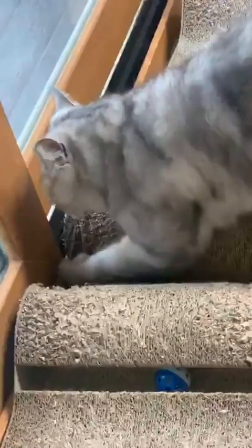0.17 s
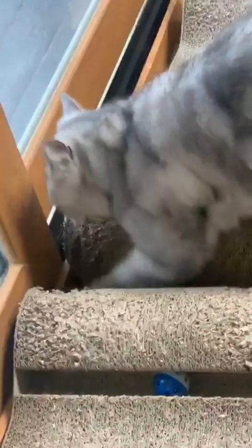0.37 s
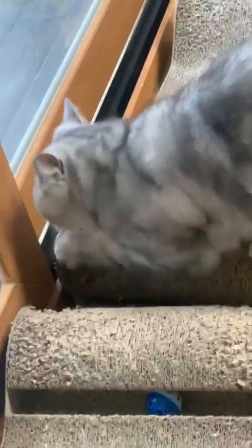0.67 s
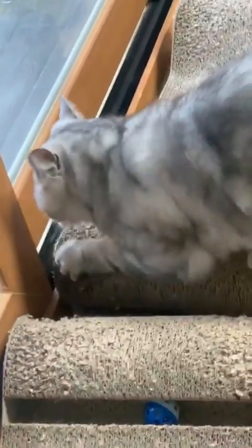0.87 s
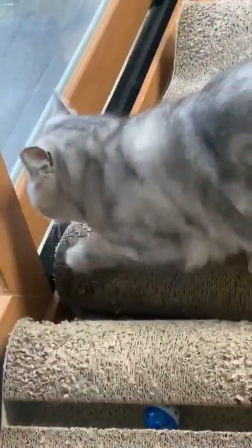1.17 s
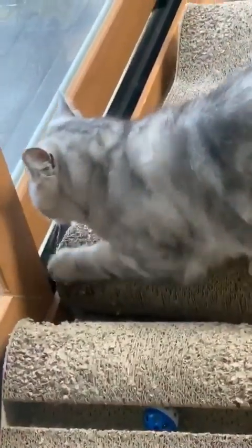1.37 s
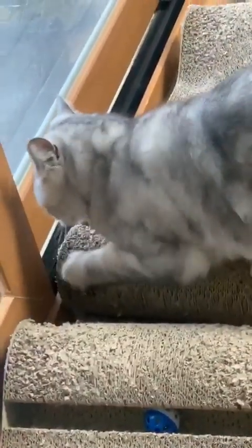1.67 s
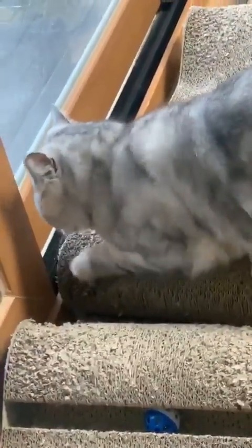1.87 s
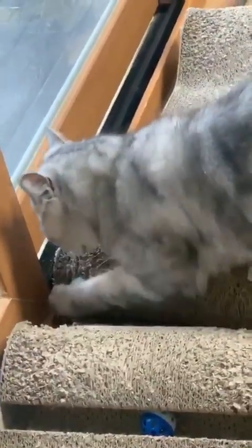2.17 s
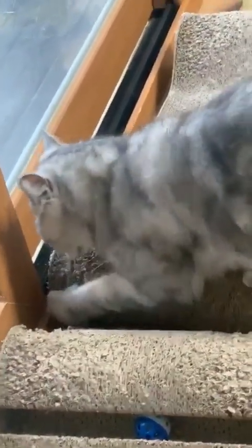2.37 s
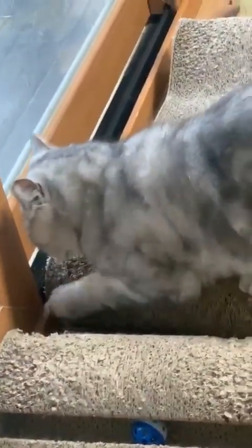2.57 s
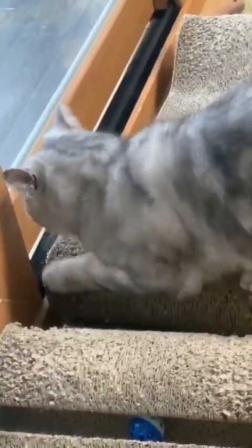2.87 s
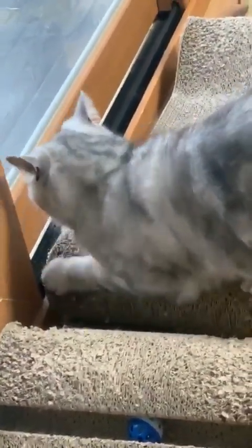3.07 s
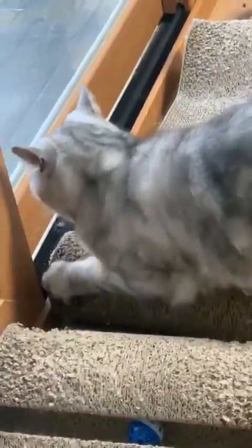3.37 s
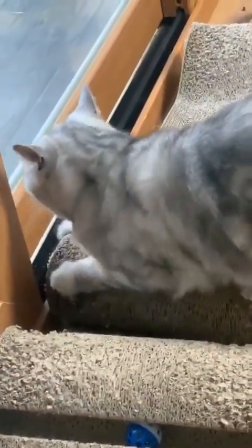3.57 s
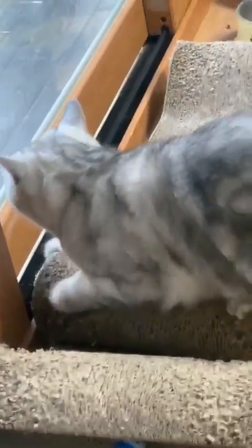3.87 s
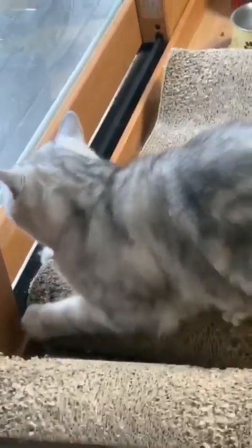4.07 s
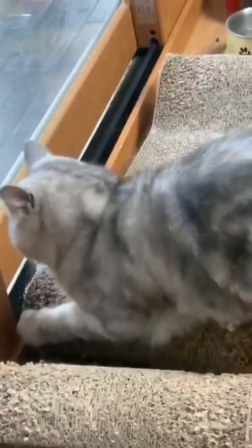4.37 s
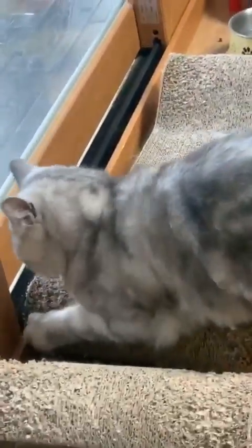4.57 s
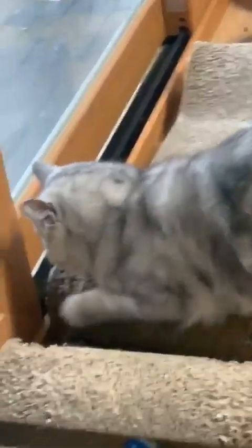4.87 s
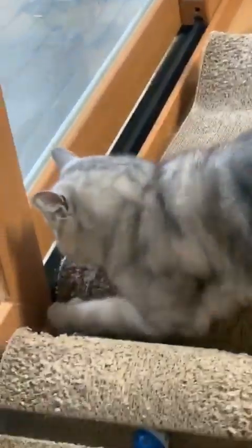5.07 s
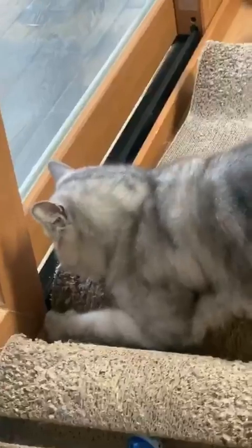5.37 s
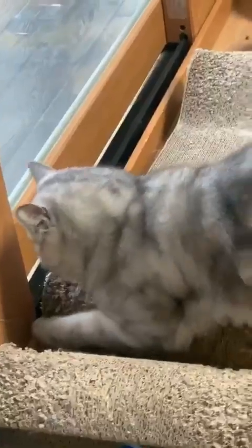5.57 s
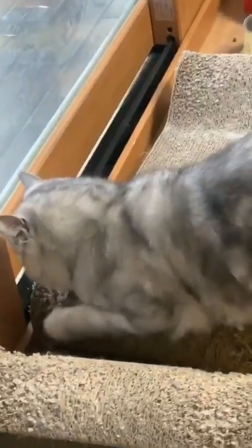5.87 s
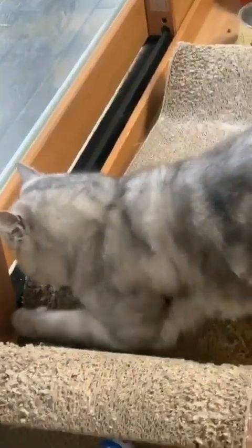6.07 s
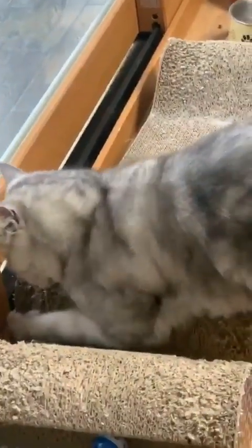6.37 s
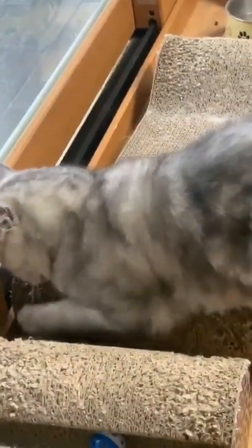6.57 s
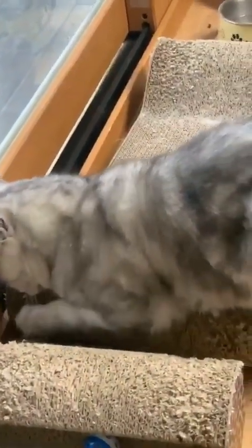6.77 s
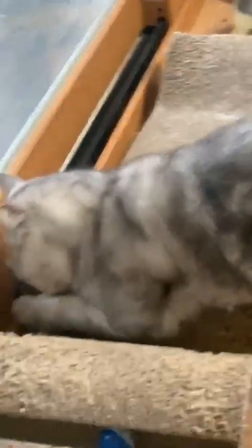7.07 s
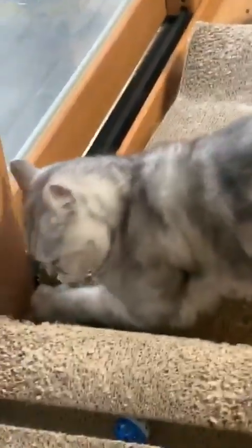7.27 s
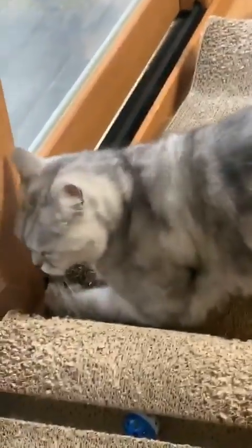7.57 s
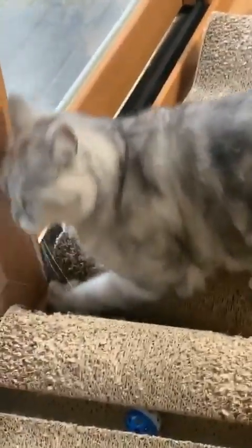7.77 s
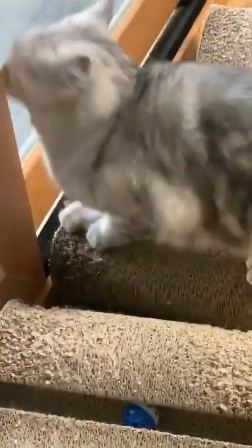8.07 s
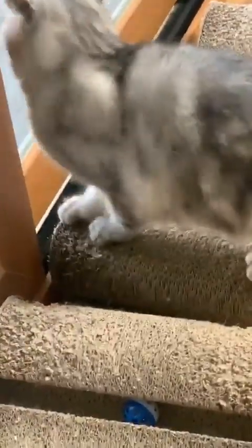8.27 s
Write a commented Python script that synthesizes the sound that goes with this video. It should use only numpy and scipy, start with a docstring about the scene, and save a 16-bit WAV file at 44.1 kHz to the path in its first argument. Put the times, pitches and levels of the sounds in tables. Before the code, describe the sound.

Close up in a fairly live room, a cat scratches a carpeted tower. Short, dry claw rasps come several a second, each with a padded, hollow thump. Wooden knocks break in, the hardest around three seconds, followed by a sparser spell. The digging then resumes with springy low plucks and bright snag ticks, ends after a last knock and stroke, and gives way to a soft breathy hiss.

```python
"""Cat digging on a carpeted tower

A cat digs and treads close by in a fairly live room. Claw drags are bursts of tiny slips and plucked fibres;
snagged loops and claw tips twang as short resonances. Paws push on a resonant platform that thuds and springs
back as a brief tone. Knocks and rubs ring modes of wood, and sways are low resonant noise. Shaped noise makes
the brushing fur, a breath-like hiss and the faint room rumble and hiss; a squeak is one thin gliding sine."""
import sys
import numpy as np
from scipy import signal
from scipy.fft import rfft, irfft, next_fast_len
from scipy.io import wavfile
from scipy.ndimage import uniform_filter1d, map_coordinates

SR = 44100
rng = np.random.default_rng(int(sys.argv[2]) if len(sys.argv) > 2 else 0)


def generate_wav(signal):
    """Clip the signal to [-1, 1] and save it as 16-bit WAV at the path in sys.argv[1]."""
    frames = np.transpose(np.atleast_2d(signal))
    scaled = np.clip(frames, -1, 1) * 32767
    pcm = np.round(scaled).astype(np.int16)
    wavfile.write(sys.argv[1], SR, pcm)


N = 371763
# time within one event, in seconds
T = np.arange(SR // 2) / SR
TOP_HZ = 14500

# A paw lands on the platform and pulls its claws through the pile. Each row: start in seconds, length in
# seconds, relative push in dB, hardness of the contact in Hz, thud of the tower in dB, relative claw hiss
# in dB, relative scrape of the backing in dB.
PAW_STROKES = [(0.174, 0.067, -33, 290, -37, -44.5, -40), (0.495, 0.047, -48, 480, -52.5, -58, -52.5),
               (0.599, 0.062, -48, 497, -45, -53, -43), (0.712, 0.04, -44, 596, -52.5, -54.5, -60),
               (0.828, 0.061, -38, 600, -48, -51, -38), (1, 0.037, -31, 680, -42, -48.5, -39.5),
               (1.21, 0.044, -56, 400, -50, -58, -49.5), (1.391, 0.032, -32.5, 750, -40, -64, -39.5),
               (1.531, 0.05, -30.5, 1070, -45, -41, -32.5), (1.645, 0.033, -34, 1300, -58, -60, -34),
               (1.715, 0.032, -45, 730, -49, -49, -46.5), (2.171, 0.039, -30, 684, -40, -53.5, -37),
               (2.273, 0.04, -39, 1100, -46.5, -45.5, -37.5), (2.452, 0.071, -40, 700, -49, -45, -36.5),
               (2.589, 0.034, -46, 1200, -57, -44.5, -50), (2.753, 0.076, -60.5, 700, -67, -72.5, -72),
               (3.416, 0.035, -32, 1010, -41.5, -42, -42), (3.546, 0.052, -48.5, 1200, -57.5, -51.5, -56),
               (3.953, 0.015, -50, 460, -58, -83, -50), (4.166, 0.022, -57.5, 450, -55.5, -71, -63),
               (4.395, 0.026, -33.5, 330, -37.5, -56, -33), (4.612, 0.036, -42, 453, -49.5, -45, -46),
               (4.746, 0.037, -44.5, 860, -55, -46, -47.5), (4.852, 0.045, -51, 700, -55.5, -56.5, -62),
               (5.208, 0.015, -34, 820, -48, -52, -30.5), (5.514, 0.042, -33, 1010, -49, -40, -31),
               (5.703, 0.05, -43, 750, -51.5, -45, -44), (5.917, 0.078, -46.5, 790, -51.5, -61, -45.5),
               (6.151, 0.042, -28, 433, -36, -48, -35.5), (6.199, 0.08, -38.5, 600, -56, -49, -43.5),
               (6.43, 0.04, -31, 860, -54, -38.5, -34), (6.606, 0.021, -46, 523, -57, -48.5, -50),
               (6.719, 0.026, -40, 900, -49, -43, -39), (7.29, 0.061, -32.5, 653, -41.5, -58, -43)]
# Hiss of the carpet pile. Each row: frequency in Hz, relative level in dB.
PILE_SPECTRUM = [(900, -38), (2200, -6), (3300, -14.5), (4400, -8), (5400, -5), (6400, 2.5), (7300, 0),
                 (8300, -5), (10200, -12.5), (12500, -7.5), (14500, -23)]


def amp(db):
    """Amplitude factor of a level in dB."""
    return 10 ** (np.asarray(db) / 20)


def unit(x):
    """Scale x to an rms of 1."""
    return x / np.sqrt(np.mean(x ** 2) + 1e-20)


def crest(x):
    """Scale x so that its loudest moment has rms 1."""
    span = round(.0073 * SR)
    return x / np.sqrt(uniform_filter1d(x ** 2, span).max() + 1e-20)


def along(points, hz):
    """Interpolate (Hz, value) points on a log frequency axis."""
    f, v = np.transpose(points)
    return np.interp(np.log(hz + 1), np.log(f + 1), v)


def add(track, s, x):
    """Mix x into the track from time s in seconds."""
    start = max(0, round(s * SR))
    track[start:start + len(x)] += x[:max(0, N - start)]


def filtered(x, response):
    """Multiply the spectrum of x by a complex response of frequency."""
    size = next_fast_len(len(x) + 8192)
    hz = np.fft.rfftfreq(size, 1 / SR)
    return irfft(rfft(x, size) * response(hz), size)[:len(x)]


def coloured(x, spectrum):
    """Shape x by a spectrum of (Hz, dB) points."""
    return filtered(x, lambda hz: amp(along(spectrum, hz)))


def ringing(x, modes):
    """Play x through a body's resonances (Hz, width Hz, dB), alternating in polarity."""
    def response(hz):
        total = 0
        for k, (centre, width, db) in enumerate(modes):
            damping = 1j * hz * width
            total = total + (-1) ** k * amp(db) * damping / (centre * centre - hz * hz + damping)
        return total
    return filtered(x, response)


def swell(length):
    """Split a stroke's length into its build-up and its decay time, in seconds."""
    rise_share = 0.37
    return rise_share * length, (1 - rise_share) * length


def stroke(rise, fall):
    """Pressure of one stroke: it builds up, then dies away exponentially."""
    build_up = np.sqrt(np.minimum(T / max(rise, .001), 1))
    return build_up * np.exp(-np.maximum(T - rise, 0) / max(fall, .002))


def press(rise, fall):
    """Weight of a soft paw: it sinks in more gradually than a plain stroke, then lets go."""
    return stroke(rise, fall) * np.sqrt(np.minimum(T / max(rise, .001), 1))


def wobble(rate, size):
    """A smooth random curve with rate knots a second."""
    knots = rng.standard_normal(1024)
    return map_coordinates(knots, [np.arange(size) * rate / SR], mode="mirror")


def slips(rate, spread_db):
    """Tiny slips: random impulses, rate a second, of uneven size and either sign."""
    hits = rng.random(len(T)) < rate / SR
    sizes = amp(spread_db * np.clip(rng.standard_normal(len(T)), -2, 2))
    return unit(hits * sizes * rng.choice([-1, 1], len(T)))


def in_room(x, wet_db, gap=0.0023):
    """Add a diffuse tail, new for each call, that sets in over gap seconds; each frequency dies at its own speed."""
    # The room's decay. Each row: frequency in Hz, time to fall by 60 dB in seconds.
    decay = [(100, 0.45), (330, 0.56), (700, 0.56), (1100, 0.45), (3000, 0.43), (7000, 0.24), (14000, 0.26)]
    hz, t, z = signal.stft(rng.standard_normal(len(T) + SR // 10), SR, nperseg=256)
    tail = signal.istft(z * amp(-60 * t / along(decay, hz)[:, None]), SR, nperseg=256)[1]
    tail *= 1 - np.exp(-(np.arange(len(tail)) / SR / gap) ** 2)
    response = amp(wet_db) * tail / np.linalg.norm(tail)
    response[0] += 1  # direct sound
    return signal.fftconvolve(x, response)


def room_tone():
    """Steady noise shaped into a low rumble and a thin hiss."""
    # Each row: frequency in Hz, relative level in dB.
    air = [(20, -8), (55, 4), (110, -5), (180, -15), (350, -14.5), (800, -26.5), (2500, -29.5), (7000, -31),
           (10000, -42.5), (14500, -39.5)]
    return amp(-60.0) * unit(coloured(rng.standard_normal(N), air))


def squeak():
    """One thin gliding whistle, a sine of moving pitch and level, as the cat lifts its head."""
    track = np.zeros(N)
    # The squeak dips, rises and sinks away. Each row: time in seconds, pitch in Hz, level in dB.
    glide = [(7.755, 12200, -92), (7.772, 11900, -71), (7.795, 11250, -81), (7.817, 10500, -92),
             (7.838, 11250, -77), (7.878, 11780, -71), (7.912, 10650, -87), (7.935, 10400, -80),
             (7.97, 9600, -93)]
    s, hz, db = np.transpose(glide)
    t = np.arange(s[0], s[-1], 1 / SR)
    cycles = np.cumsum(np.interp(t, s, hz)) / SR
    tone = unit(np.sin(2 * np.pi * cycles))
    add(track, s[0], amp(np.interp(t, s, db)) * tone)
    return track


def breath():
    """A soft, breath-like hiss of finely grained noise that swells and lingers."""
    track = np.zeros(N)
    # Swell of the hiss. Each row: time in seconds, level in dB.
    level = [(7.3, -88), (7.45, -63), (7.58, -60.5), (7.7, -60), (7.8, -68.5), (7.94, -68), (8.1, -92)]
    # Colour of the hiss. Each row: frequency in Hz, relative level in dB.
    hiss = [(300, -11), (1200, 4), (2500, -2), (4500, -8.5), (7500, -4.5), (10000, -18), (14500, -11.5)]
    s, db = np.transpose(level)
    t = np.arange(s[0], s[-1], 1 / SR)
    grain = rng.standard_normal(len(t)) * amp(1.7 * wobble(300, size=len(t)))
    add(track, s[0], amp(np.interp(t, s, db)) * unit(coloured(grain, hiss)))
    return track


def fur():
    """The coat drags softly over the pile as the cat shifts its weight: noise, uneven as it catches on tufts."""
    # Brushing between strokes. Each row: time in seconds, relative level in dB.
    brushing = [(0.0, -51.5), (0.45, -57), (1.3, -53.5), (1.71, -50.5), (2.02, -59), (2.44, -54),
                (2.72, -59.5), (2.9, -62.5), (3.15, -51.5), (3.4, -58), (3.801, -68), (4.15, -65.5),
                (4.3, -57), (4.58, -48), (4.93, -59.5), (5.59, -51), (5.9, -56), (6.6, -50.5),
                (7.03, -64.5), (7.42, -51.5), (7.7, -65.5), (7.98, -70.5), (8.43, -73)]
    # Fur on carpet. Each row: frequency in Hz, relative level in dB.
    coat = [(200, 3.5), (350, 6.5), (1000, 9.5), (2800, -5), (4500, -6), (6800, -3), (9500, -12.5),
            (14500, -28)]
    level_db = -2.5 + np.interp(np.arange(N) / SR, *np.transpose(brushing))
    tufts = amp(2.5 * wobble(110, size=N))
    brush = coloured(rng.standard_normal(N) * tufts, coat)
    return amp(level_db + 2 * wobble(16, size=N)) * unit(brush)


def knocks():
    """The tower hits wood: a firm contact and a dying chatter ring its modes, with a bright, reverberant crack on top."""
    track = np.zeros(N)
    # Each row: start in seconds, level in dB, crack in dB, weight of the low modes in dB, treble tilt in dB
    # per octave.
    hits = [(0.0, -32, -53, 5, -4), (0.858, -30, -54.5, 0, 3), (3.023, -20, -44.5, 1, 7),
            (3.082, -43.5, -54, 12.5, 6), (3.12, -34, -62, 15, 3), (3.948, -57, -65, 15, 9),
            (4.377, -24.5, -56, 1.5, -4), (5.085, -25.5, -52.5, -0.5, -6), (5.207, -33.5, -69, -15, 4),
            (7.116, -23, -46, -0.5, 1.5)]
    # Modes of the knocked wood; the narrow ones ring on. Each row: pitch in Hz, width in Hz, relative level in dB.
    wood = [(130, 45, -9), (278, 35, -11), (342, 35, -3), (590, 90, -3), (725, 80, 3), (792, 10, 11),
            (863, 26, -1), (1024, 18, 2), (1085, 130, -4), (1146, 16, 6), (1190, 80, -2), (1299, 40, -1),
            (1456, 70, -11), (1950, 300, -23), (2300, 260, -21)]
    # The padded contact passes little of the treble. Each row: frequency in Hz, gain in dB.
    padding = [(1300, 0), (1550, -.5), (1900, -4), (2400, -6), (4000, -14)]
    # The bright edge of a knock. Each row: frequency in Hz, relative level in dB.
    edge = [(800, -12), (1700, -1), (2250, 1), (2900, -6), (5000, -1), (7500, -6), (10000, -20),
            (14500, -26)]
    low_modes_hz, tilt_above_hz = 520, 900
    chatter_db, grit_db = -24, -9.5  # loose frame and grinding surfaces, noise against the contact impulse
    contact = signal.unit_impulse(len(T))
    for s, db, crack_db, low_db, tilt_db in hits:
        struck = []
        for hz, width, level in wood:
            tilt = tilt_db * max(0, np.log2(hz / tilt_above_hz))
            struck.append((hz, width, level + low_db * (hz < low_modes_hz) + tilt))
        blow = in_room(contact, wet_db=-1.5, gap=0.005)
        add(blow, 0, amp(chatter_db) * rng.standard_normal(len(T)) * stroke(rise=0.0059, fall=0.0035))
        crack = in_room(contact, wet_db=19.0)  # nearly all room tail
        add(crack, 0, amp(grit_db) * rng.standard_normal(len(T)) * stroke(rise=.0005, fall=0.0075))
        knock = amp(db) * crest(coloured(ringing(blow, struck), padding))
        add(track, s, knock + amp(crack_db) * crest(coloured(crack, edge)))
    return track


def rubs():
    """The tower rubs along the wood: tiny slips ring its modes, with one pitch favoured."""
    track = np.zeros(N)
    # Each row: start in seconds, length in seconds, level in dB, pitch in Hz.
    passes = [(0.843, 0.037, -42, 870), (0.947, 0.065, -47, 890), (1.922, 0.057, -42.5, 830),
              (1.958, 0.043, -54, 1020), (2.315, 0.033, -42, 910), (6.154, 0.0052, -37, 1250)]
    # Modes of the rubbed wood. Each row: pitch in Hz, width in Hz, relative level in dB.
    wood = [(130, 45, -9), (278, 35, -11), (342, 35, -3), (590, 90, -3), (725, 80, 3), (792, 10, 11),
            (863, 26, -1), (1024, 18, 2), (1085, 130, -4), (1146, 16, 6), (1190, 80, -2), (1299, 40, -1),
            (1456, 70, -11), (1950, 300, -23), (2300, 260, -21)]
    for s, length, db, hz in passes:
        rubbing = ringing(slips(rate=760, spread_db=3.5) * stroke(*swell(length)), wood)
        pitched = ringing(rubbing, [(hz, hz / 3, 0)])
        add(track, s, in_room(amp(db) * crest(pitched), wet_db=-12.5))
    return track


def sways():
    """The tower sways and rumbles under the cat's shifting weight: noise through a broad resonance, twice."""
    track = np.zeros(N)
    # Each row: start in seconds, length in seconds, level in dB, pitch in Hz.
    leans = [(0.077, .012, -41, 80), (0.213, 0.17, -43, 55), (3.043, 0.16, -42, 47.7),
             (3.156, 0.01, -38, 54.6), (8.31, 0.2, -57, 175)]
    for s, length, db, hz in leans:
        base = [(hz, hz, 0)]
        rocking = rng.standard_normal(len(T)) * stroke(*swell(length))
        add(track, s, amp(db) * crest(ringing(ringing(rocking, base), base)))
    return track


def recoils():
    """A hard tug lets go and the platform springs back with a low pluck, a few swings of a sine."""
    track = np.zeros(N)
    # Each row: start in seconds, level in dB, pitch in Hz.
    springs = [(0.186, -27, 345), (0.626, -34, 340), (1.216, -34, 328), (1.393, -31.5, 387),
               (3.425, -33.5, 404), (3.949, -43.5, 330), (5.216, -32, 318), (5.517, -24.5, 362),
               (6.171, -21, 349), (6.433, -32.5, 345), (7.317, -44, 297), (7.352, -34.5, 328)]
    for s, db, hz in springs:
        swing = np.sin(2 * np.pi * hz * T) * stroke(rise=0.0094, fall=0.004)
        add(track, s, in_room(amp(db) * crest(swing), wet_db=-11))
    return track


def paws():
    """A paw judders over the carpet, ringing the hollow platform, and the whole tower thuds."""
    track = np.zeros(N)
    # Resonances of the carpeted platform. Each row: pitch in Hz, width in Hz, relative level in dB.
    platform = [(268, 45, -4), (342, 55, 0), (400, 70, -6), (550, 130, -12), (700, 160, -7)]
    # Thud of the tower. Each row: frequency in Hz, relative level in dB.
    thud_spectrum = [(25, -41.5), (60, -24), (100, -8), (145, -6), (185, -10.5), (230, -14.5), (500, -56)]
    thud_lag_s = .008  # the tower gives a moment after the paw lands
    for s, length, push_db, hard_hz, thud_db, *_ in PAW_STROKES:
        rise, fall = swell(length)
        judder = slips(rate=1500, spread_db=3) * press(rise, fall * .5)
        # a soft pad passes only the low part of the force
        force = filtered(judder, lambda hz: 1 / (1 + 1j * np.sqrt(2) * hz / hard_hz - (hz / hard_hz) ** 2))
        thump = amp(push_db + 1.67) * crest(ringing(force, platform))
        shake = rng.standard_normal(len(T)) * stroke(rise, fall)
        thud = amp(thud_db) * crest(coloured(shake, thud_spectrum))
        add(track, s, in_room(thump, wet_db=-6.5))
        add(track, s + thud_lag_s, in_room(thud, wet_db=-1.5))
    return track


def flicks():
    """A hard claw tip flicks off the weave: a short skid of slips rings it with a thin, bright tick."""
    track = np.zeros(N)
    # Each row: start in seconds, relative level in dB, pitch in Hz.
    ticks = [(1.646, -39, 7100), (2.071, -56, 6450), (2.407, -61, 6500), (2.45, -49, 6600),
             (2.456, -36, 6300), (2.474, -43, 6600), (2.53, -48, 6750), (5.084, -46.5, 6200),
             (5.912, -52, 6240), (6.332, -66, 6300), (6.583, -42, 6240), (6.841, -49, 6400),
             (6.908, -55, 6500), (7.294, -50, 6500), (7.4, -48, 7100)]
    sharpness = 6  # pitch over width
    for s, db, hz in ticks:
        skid = slips(rate=9000, spread_db=2) * stroke(rise=.002, fall=.003)
        tip = [(hz, hz / sharpness, 0)]
        add(track, s, in_room(amp(db - 2.0) * crest(ringing(skid, tip)), wet_db=-5))
    return track


def snags():
    """A loop caught on a claw rasps louder as it strains, then tears free with a short resonant twang."""
    track = np.zeros(N)
    # Each row: release in seconds, level of the twang in dB, pitch in Hz, rise in seconds, fall in seconds.
    caught = [(0.261, -53.5, 13000, 0.041, 0.053), (1.01, -54, 10500, 0.0032, 0.005),
              (1.165, -44, 1810, 0.00059, .0045), (1.217, -51.5, 4800, 0.0022, 0.008),
              (1.535, -45, 2100, 0.012, 0.0026), (1.547, -53, 2000, 0.0023, .0038),
              (1.563, -52, 11000, 0.01, .014), (1.65, -45, 2120, .0015, 0.0045),
              (1.829, -53.5, 3130, .001, 0.0025), (1.926, -52, 6200, 0.0044, .004),
              (2.281, -47, 2200, 0.0017, 0.0044), (2.289, -47.5, 5800, 0.0036, 0.0093),
              (2.468, -46, 1800, 0.0053, 0.0034), (2.501, -49, 5200, .004, 0.0067),
              (3.388, -48, 5200, .001, 0.0056), (5.38, -56, 12900, 0.011, 0.0089),
              (5.516, -37, 5900, 0.00068, 0.0041), (5.523, -36.5, 3140, 0.0038, 0.0035),
              (6.431, -42.5, 6400, 0.0017, 0.0035), (6.434, -33, 1820, 0.0017, .004),
              (6.463, -42, 4500, .003, .0042), (6.731, -42, 5360, 0.0092, 0.0068),
              (6.732, -39.5, 5500, 0.0012, 0.0051), (7.303, -54, 5130, 0.0064, 0.0083),
              (7.4, -57.5, 8500, .001, .0025)]
    lead, sharpness = .1, 1.3  # seconds ahead of the release; pitch over width
    for s, db, hz, rise, fall in caught:
        strain = np.exp(-np.maximum((lead - T) / max(rise, .0005), (T - lead) / max(fall, .001)))
        release = slips(rate=9000, spread_db=3) * strain
        loop = [(hz, hz / sharpness, 0)]
        twang = crest(ringing(ringing(release, loop), loop))
        rasp = .3 * crest(coloured(release, PILE_SPECTRUM))
        add(track, s - lead, in_room(amp(db) * (twang + rasp), wet_db=-7.0))
    return track


def plucks(rate, spread_db, centre_hz, cycles):
    """Single fibres plucked at random, each a sine at its own pitch that fades over a few cycles."""
    count = int(rate * T[-1])
    hz = np.clip(centre_hz * 2 ** (0.68 * rng.standard_normal((count, 1))), 900, TOP_HZ)
    size = amp(spread_db * np.clip(rng.standard_normal((count, 1)), -2, 2))
    age = np.arange(SR // 200)
    phase = hz * age / SR  # in cycles
    grains = size * np.sin(2 * np.pi * phase) * np.exp(-phase / cycles)
    starts = rng.integers(len(T), size=(count, 1))
    return unit(np.bincount((starts + age).ravel(), grains.ravel(), len(T))[:len(T)])


def rips():
    """Stick and slip: the grip jumps at each loop of the pile and fades until the next, over a steady drag."""
    loops_per_s, scatter = 125, .6  # typical rate, unevenness of the spacing
    fall_s, drag = .0018, .25
    gaps = np.exp(scatter * rng.standard_normal(256)) / loops_per_s
    starts = np.cumsum(gaps) - gaps[0]
    loop = np.searchsorted(starts, T, side="right") - 1
    sizes = amp(rng.uniform(-3, 3, len(gaps)))
    return drag + sizes[loop] * np.exp(-(T - starts[loop]) / fall_s)


def claws():
    """Each drag sinks in and rips through the loops: fibres hiss and crackle, and the stiff backing scrapes."""
    track = np.zeros(N)
    # The claws graze the carpet with no weight on the paw. Each row: start in seconds, length in seconds,
    # relative hiss in dB, relative scrape of the backing in dB.
    grazes = [(0.232, 0.043, -46, -46.5), (1.158, 0.024, -60, -43), (1.42, 0.056, -55, -60),
              (1.885, 0.057, -50, -48.5), (2.02, 0.01, -69, -59), (2.061, 0.02, -62, -56.5),
              (2.354, 0.013, -45.5, -46), (2.96, 0.054, -58, -56), (3.385, 0.026, -40, -41),
              (3.485, 0.028, -51.5, -52), (3.665, 0.035, -54, -58), (3.853, 0.024, -60.5, -64),
              (4.219, 0.023, -62, -59), (4.434, 0.038, -48, -41), (4.514, 0.025, -51, -46.5),
              (4.864, 0.076, -50.5, -49.5), (5.337, 0.069, -55, -43.5), (5.436, 0.02, -50, -42),
              (5.608, 0.016, -49, -43.5), (5.785, 0.022, -49.5, -49.5), (5.843, 0.027, -54.5, -59),
              (6.021, 0.011, -73.5, -50), (6.33, 0.019, -49.5, -42), (6.363, 0.013, -50.5, -38.5),
              (6.476, 0.021, -64, -38.5), (6.843, 0.024, -65, -62), (6.935, 0.035, -64, -56)]
    # Scrape of the backing. Each row: frequency in Hz, relative level in dB.
    backing = [(250, 2.5), (480, 7), (700, 3), (900, 4.5), (1100, 3), (1550, -5.5), (2000, -5.5),
               (2800, -18), (5000, -21), (12000, -51.5)]
    lead_s, stretch = 0.0043, 0.97  # the claws touch before the pad; their drag against the paw's length
    pulls = []
    for s, length, *_, hiss_db, scrape_db in PAW_STROKES:
        pulls.append((s - lead_s, length * stretch, hiss_db, scrape_db))
    for s, length, hiss_db, scrape_db in pulls + grazes:
        pressure = press(*swell(length)) * rips()
        crackle = plucks(rate=2200, spread_db=3.5, centre_hz=5500, cycles=2.5)
        fibres = (slips(rate=6000, spread_db=3) + crackle) * pressure
        tugs = slips(rate=2500, spread_db=2) * pressure
        hiss = amp(hiss_db - 1.9) * crest(coloured(fibres, PILE_SPECTRUM))
        scrape = amp(scrape_db + 1) * crest(coloured(tugs, backing))
        add(track, s, in_room(hiss + scrape, wet_db=-3.0))
    return track


def scene():
    """The cat and its tower, close by, over the quiet of the room."""
    background = room_tone() + squeak() + breath() + fur()
    tower = knocks() + rubs() + sways() + recoils()
    cat = paws() + flicks() + snags() + claws()
    return (background + tower + cat)[None]


def record(dry):
    """The microphone keeps nothing above its band limit."""
    return np.array([filtered(x, lambda hz: hz < TOP_HZ) for x in dry])


dry = scene()
out = record(dry)
generate_wav(out)
```